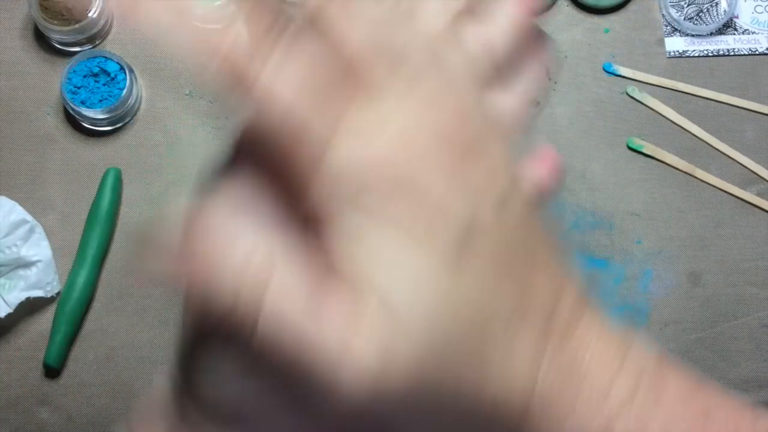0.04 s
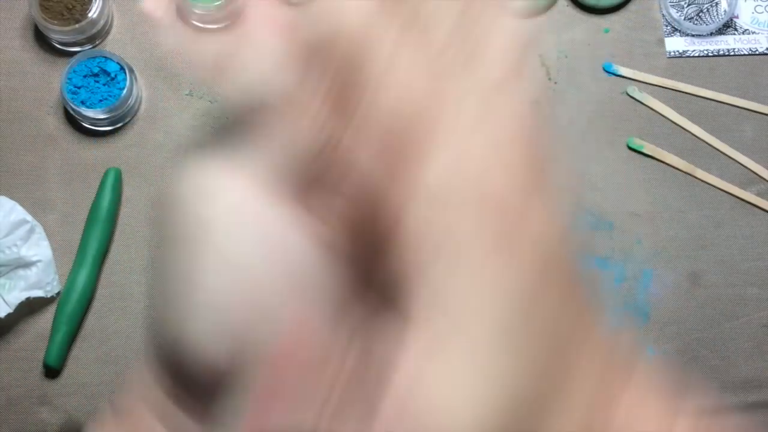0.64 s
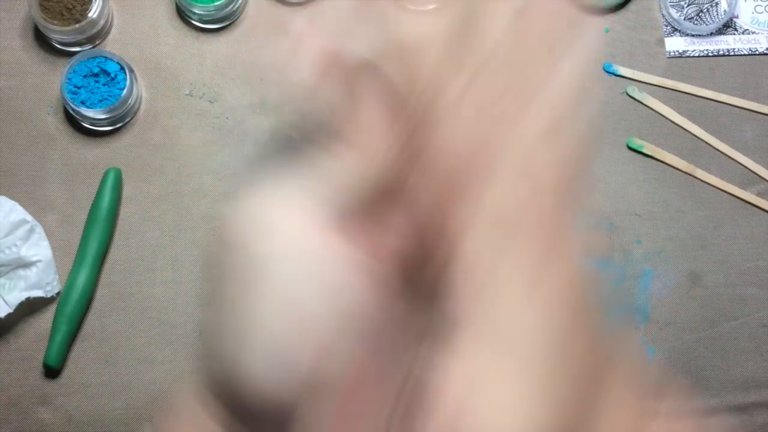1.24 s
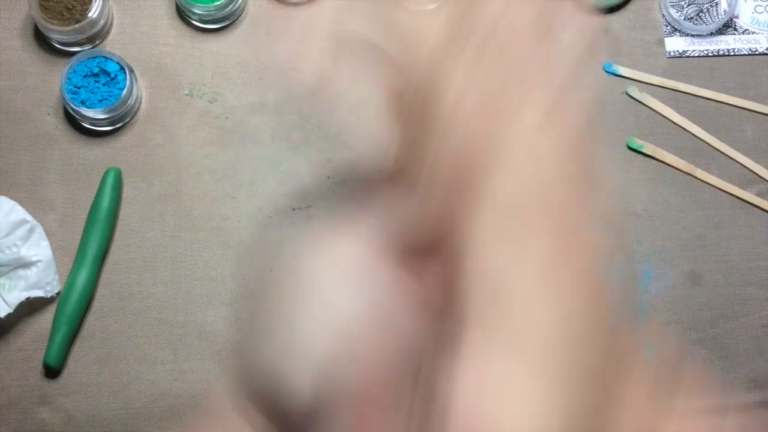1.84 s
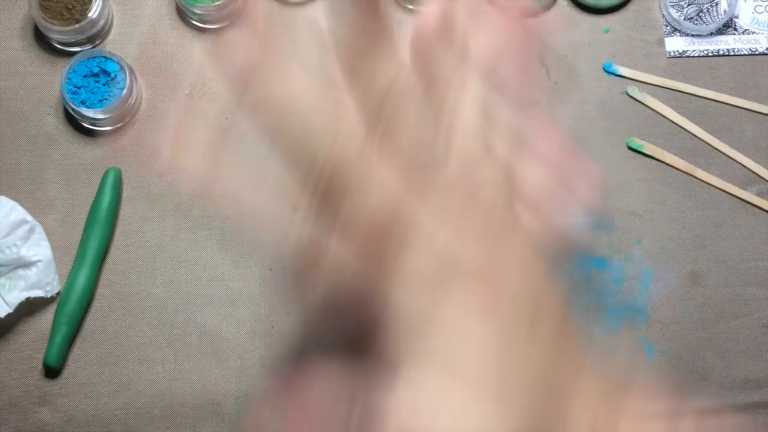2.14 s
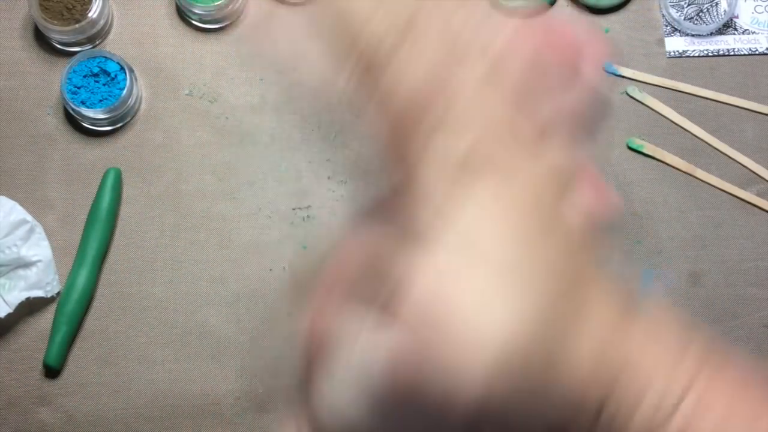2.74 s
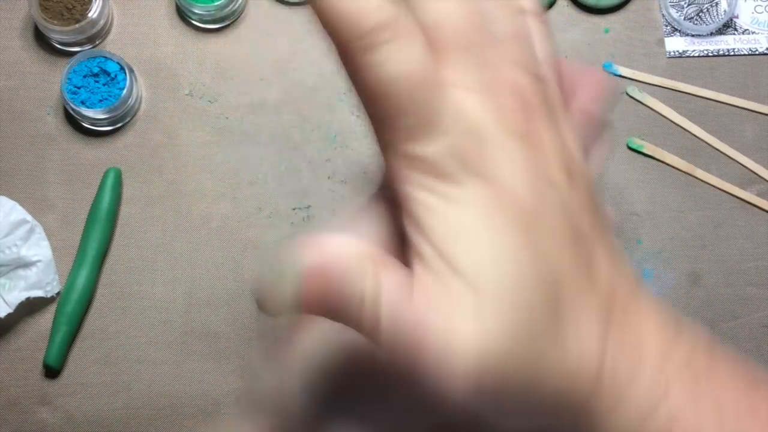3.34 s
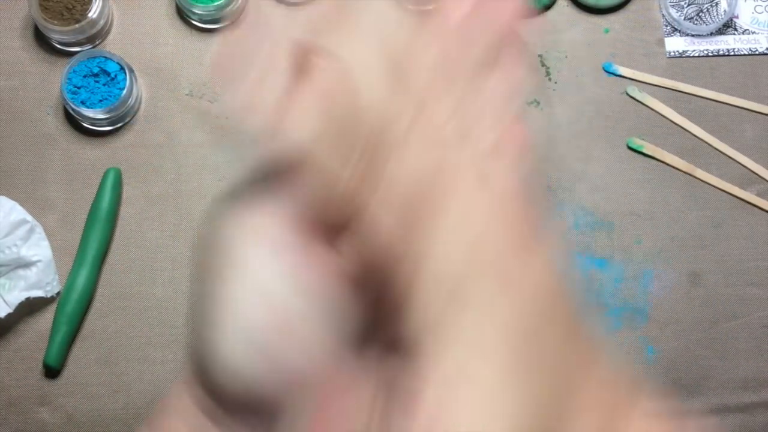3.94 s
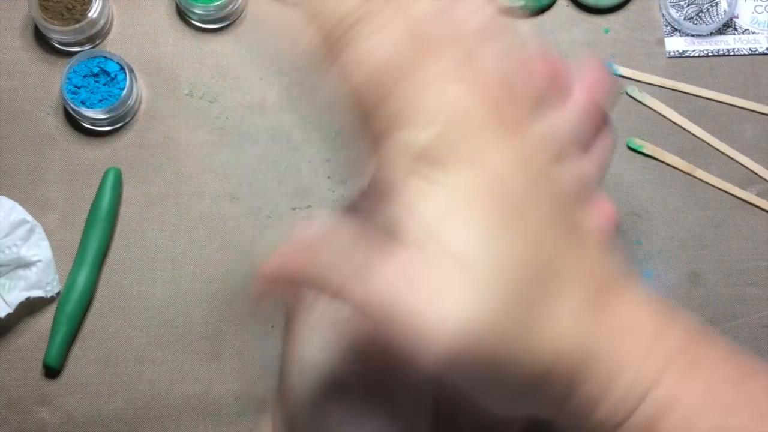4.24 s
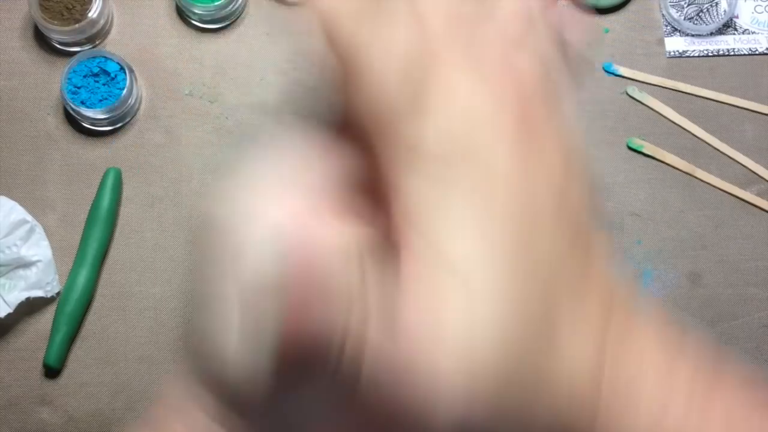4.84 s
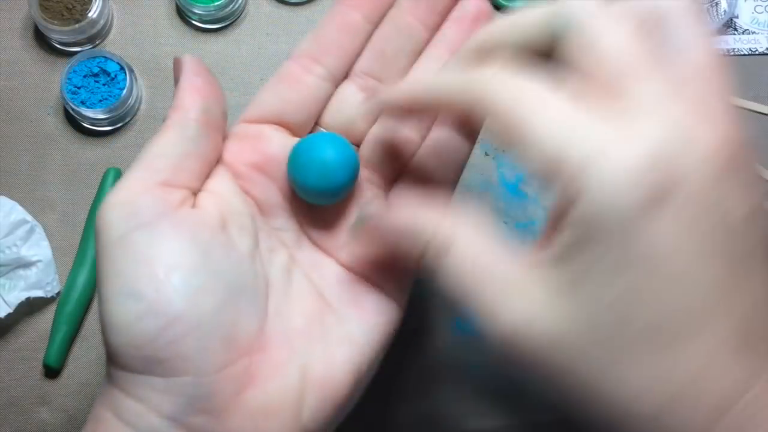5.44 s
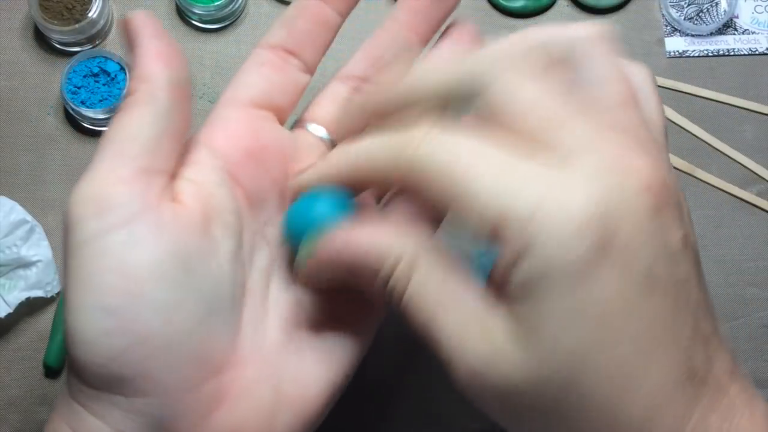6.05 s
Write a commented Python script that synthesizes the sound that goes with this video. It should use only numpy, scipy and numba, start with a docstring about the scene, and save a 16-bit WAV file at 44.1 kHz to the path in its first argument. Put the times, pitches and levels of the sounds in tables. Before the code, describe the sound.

Dry palms rub against each other, rolling a ball of soft clay, heard close above a table in a quiet room. The swishing starts lightly and is at full strength from about 0.5 seconds, running at roughly ten strokes a second. Bright, hissy pushes alternate with softer returns, and the hollow between the cupped hands adds a slight airy ring that shifts in pitch with each stroke. Underneath, the clay gives a faint dull rub and occasional soft, low bumps against the flesh. The rubbing is strongest around 1 second and becomes a little softer and looser from 3 seconds. Just after 5 seconds the hands slide apart with a last light swish. At about 5.6 and 5.9 seconds a fingertip very faintly brushes the palm to pick up the ball, over a low, steady room rumble and hiss.

```python
"""Rolling a clay ball between the palms.

Dry skin swishes over skin about ten times a second, close above a table in a quiet room.
The hollow between the cupped hands rings with the friction and dips in pitch as it opens.
The soft clay adds a dull rub and bumps against the flesh. After five seconds the hands part
and a fingertip brushes the palm to pick up the ball."""
import sys
import numpy as np
from scipy import signal
from scipy.fft import rfft, irfft, next_fast_len
from scipy.io import wavfile
from numba import njit

SR = 44100
rng = np.random.default_rng(int(sys.argv[2]) if len(sys.argv) > 2 else 0)


def int16_out(signal):
    """Quantize to a 16-bit WAV file."""
    q = np.round(np.clip(np.atleast_2d(signal).T, -1, 1) * 32767)
    wavfile.write(sys.argv[1], SR, q.astype(np.int16))


N = 269350
TIME = np.arange(N) / SR

# Noise spectra: freq_hz, relative_db
ROOM_SPECTRUM = [(25, -27), (40, -15), (54, 2.5), (90, -3.5), (160, -1.5), (240, -9.5), (320, -9),
                 (700, -13.5), (2800, -17), (8000, -18), (11000, -25), (14000, -35), (15500, -74)]
FLESH_SPECTRUM = [(25, -12), (45, -8.5), (65, 0), (110, -3), (200, -10.5), (400, -32.5)]
CLAY_SPECTRUM = [(120, -11), (220, 1), (330, 4.5), (550, -1), (800, -13), (1500, -24.5)]
SKIN_SPECTRUM = [(700, -28), (1300, -19), (2000, -6.5), (3200, -7.5), (4100, -7.5), (5200, -3.5),
                 (6300, -1), (7700, -0.5), (9000, -3), (11000, -6.5), (13000, -9), (15500, -11.5)]
# Ball bumping the flesh: peak_s, level_db
BALL_BUMPS = [(.04, -68), (.52, -69), (.645, -58.5), (.76, -65), (1.0, -66), (1.33, -63.5), (1.78, -69),
              (2.47, -66), (3.66, -69.5), (5.56, -67)]
# Clay rubbing the palms: time_s, level_db
CLAY_LEVEL = [(0, -77), (.6, -74.5), (1.12, -70), (1.35, -79.5), (1.8, -76.5), (2.05, -71), (2.4, -78),
              (3.25, -68), (3.7, -80.5), (4.55, -69.5), (5.3, -82.5), (5.75, -74), (6.11, -83)]
# Light sliding contact between strokes: time_s, drive_db
LIGHT_CONTACT = [(0.0, -81), (0.25, -65), (.6, -59.5), (0.9, -49.5), (1.2, -53), (1.31, -68.5), (1.4, -62),
                 (2.0, -55.5), (2.5, -58.5), (3.0, -57), (4.0, -56), (5.0, -57), (5.25, -84), (5.3, -94)]
# Finger spread, as the share of ring power in the finger gap: time_s, share
FINGER_SPREAD = [(0, 0.06), (.6, 0.3), (1.1, 0.38), (1.8, 0.33), (2.7, 0.14), (3.2, 0.56), (4.0, 0.56),
                 (4.9, 0.5), (5.05, 0.03)]
# Bright push of each circle: peak_s, drive_db, length_s, pitch_hz, ring_offset_db, overtone_offset_db
PUSH_STROKES = [(0.536, -42.5, 0.025, 2400, 3, 8), (0.782, -43, 0.039, 2210, 0.5, 5.5),
                (0.956, -40.5, 0.056, 2330, -1, 4), (1.16, -41.5, 0.038, 2430, -2, 6.5),
                (1.367, -48, 0.056, 2410, -2.5, 0), (1.571, -49, 0.046, 2550, -6, 0),
                (1.773, -44.5, 0.035, 2500, -3, 4.5), (1.964, -42.5, 0.038, 2360, -1, 1),
                (2.154, -41, 0.034, 2610, -2.5, 1.5), (2.371, -51.5, 0.046, 2490, -5, 3),
                (2.576, -44.5, 0.028, 2600, -1.5, 0), (2.788, -43.5, 0.039, 2580, -1.5, 2),
                (2.991, -45, .036, 2980, -4.5, 4.5), (3.227, -48, .052, 1960, -1, 6),
                (3.435, -44, 0.031, 1960, -2.5, 4.5), (3.641, -45.5, 0.045, 2960, -2, 2.5),
                (3.879, -46, 0.052, 1900, -2.5, 5.5), (4.092, -45.5, 0.035, 2090, -2, 8.5),
                (4.308, -48.5, 0.051, 1890, -1.5, 3.5), (4.525, -45, 0.051, 1990, -3.5, 1.5),
                (4.745, -47, 0.052, 1840, -2, 4.5), (4.965, -45.5, 0.04, 2500, -4, 6)]
# Softer return: peak_s, drive_db, length_s, pitch_hz, ring_offset_db, slide_oct_per_length
RETURN_STROKES = [(0.168, -51.5, 0.077, 1660, -1, -0.051), (0.336, -48.5, 0.044, 2360, .5, -0.16),
                  (0.417, -42.5, 0.052, 1780, -0.5, -0.071), (0.677, -53.5, 0.033, 3120, 8.5, -0.21),
                  (0.858, -40, 0.048, 2100, -2.5, -0.11), (1.053, -43.5, 0.052, 1880, 5, -0.016),
                  (1.256, -49, 0.048, 2750, 1, -0.031), (1.47, -51, 0.021, 2530, 3, 0.12),
                  (1.666, -47.5, .028, 2410, 2.5, -0.12), (1.85, -46, 0.031, 2390, .5, -0.02),
                  (2.044, -46, 0.037, 2430, 1.5, -0.1), (2.237, -54, 0.1, 2580, 0.5, 0.016),
                  (2.478, -52, .027, 2650, 1, 0.047), (2.672, -47.5, .033, 2500, 5, 0.079),
                  (2.877, -47.5, 0.056, 2690, 0, 0.047), (3.096, -56, 0.041, 2950, 1.5, 0.02),
                  (3.319, -51.5, 0.051, 2600, 1, 0.071), (3.541, -51, .072, 2690, -0.5, 0.25),
                  (3.752, -51.5, 0.07, 2400, -0.5, 0), (3.966, -51.5, 0.062, 2030, 2, .35),
                  (4.194, -51, 0.051, 1900, 1, .35), (4.415, -51, 0.069, 2010, -1, 0.38),
                  (4.645, -50, 0.088, 2280, -4.5, 0.26), (4.856, -50, 0.036, 2880, 1, 0.025),
                  (5.075, -51, 0.074, 1845, 2.5, 0.18)]
# Fingers brushing skin, mostly plain hiss: peak_s, drive_db, length_s
FINGER_BRUSHES = [(0.118, -55, 0.073), (0.307, -50, 0.08), (0.5, -46.5, 0.056), (0.71, -41, 0.054),
                  (1.129, -43, 0.043), (1.507, -55, .048), (1.715, -54, 0.064), (1.924, -48.5, 0.014),
                  (2.116, -47.5, 0.03), (2.308, -48.5, .034), (2.733, -53.5, 0.043), (2.96, -47.5, 0.053),
                  (3.36, -52, 0.051), (5.132, -58.5, 0.15), (5.63, -71, .06), (5.87, -79, 0.053)]

PUSH_RISE, RETURN_RISE, BRUSH_RISE = 0.39, 0.51, 0.47  # share of length spent speeding up


def from_db(db):
    """Decibels to gain."""
    return 10 ** (np.asarray(db) / 20)


def unit_rms(x):
    """Scale to rms 1."""
    return x / np.sqrt(np.mean(x ** 2) + 1e-20)


def curve(rows):
    """Interpolate (time_s, value) rows at every sample."""
    return np.interp(TIME, *np.transpose(rows))


def drift(rate_hz):
    """Slow random wander, rms about 1."""
    hop, warmup = 40, 2000
    pole = np.exp(-2 * np.pi * hop * rate_hz / SR)
    noise = rng.standard_normal(N // hop + warmup + 2)
    slow = signal.lfilter([1], [1, -2 * pole, pole * pole], noise)[warmup:]
    return np.interp(np.arange(N) / hop, np.arange(len(slow)), unit_rms(slow))


def swell(peak_s, length_s, rise, shape):
    """Envelope peaking at 1; shape 1 is pointed, 2 a bell, higher a flat top."""
    out = np.zeros(N)
    near = slice(max(int((peak_s - .25) * SR), 0), int((peak_s + .25) * SR))
    since_s = TIME[near] - peak_s
    side_s = length_s * np.where(since_s < 0, rise, 1 - rise)
    out[near] = np.exp(-np.abs(since_s / side_s) ** shape)
    return out


def coloured(x, spectrum):
    """Apply a smooth spectrum; rms 1."""
    size = next_fast_len(N)
    freq_hz, level_db = np.transpose(spectrum)
    bins_hz = np.maximum(np.arange(size // 2 + 1) * SR / size, 1)
    gain = from_db(np.interp(np.log(bins_hz), np.log(freq_hz), level_db))
    return unit_rms(irfft(rfft(x, size) * gain, size)[:N])


@njit
def moving_bandpass(x, angle_rad, radius):
    """Two-pole band-pass with a per-sample centre."""
    y = np.zeros(len(x))
    for i in range(2, len(x)):
        y[i] = x[i] - x[i - 2] + 2 * radius * np.cos(angle_rad[i]) * y[i - 1] - radius ** 2 * y[i - 2]
    return y


def air_resonance(x, centre_hz, width_hz, band_hz):
    """Air pocket with moving pitch, skirts cut outside band_hz; rms 1."""
    rung = moving_bandpass(x, 2 * np.pi * centre_hz / SR, np.exp(-np.pi * width_hz / SR))
    skirts = signal.butter(2, band_hz, "band", fs=SR, output="sos")
    return unit_rms(signal.sosfilt(skirts, rung))


def room_tone(level_db=-69):
    """Steady rumble and hiss of the room."""
    return from_db(level_db) * coloured(rng.standard_normal(N), ROOM_SPECTRUM)


def reflections(x, relative_db=-15, t60_s=0.23, count=40):
    """Table and walls return a short scatter of echoes."""
    echoes = np.zeros(N)
    for delay_s in rng.uniform(.003, .15, count):
        lag = int(delay_s * SR)
        echoes[lag:] += rng.choice([-1, 1]) * from_db(-60 * delay_s / t60_s) * x[:N - lag]
    return from_db(relative_db) * np.std(x) * unit_rms(echoes)


def flesh_rumble(rolling_db=-72, follow=0.12):
    """Flesh rumbles with the contact and swells at each bump of the ball."""
    contact_db = curve(LIGHT_CONTACT)
    power = from_db(rolling_db + follow * (contact_db - np.median(contact_db))) ** 2
    for peak_s, level_db in BALL_BUMPS:
        power += (from_db(level_db) * swell(peak_s, length_s=0.094, rise=0.34, shape=0.87)) ** 2
    return np.sqrt(power) * coloured(rng.standard_normal(N), FLESH_SPECTRUM)


def clay_rub():
    """Soft clay rubs dully on the palms."""
    return from_db(curve(CLAY_LEVEL)) * coloured(rng.standard_normal(N), CLAY_SPECTRUM)


def friction(slips_per_s, spread_db, smooth_db):
    """Skin ridges catch and let go: dense uneven slips in a smooth hiss; rms 1."""
    sizes = from_db(spread_db * np.minimum(rng.exponential(1, N), 6)) * rng.choice([-1, 1], N)
    slips = sizes * (rng.random(N) < slips_per_s / SR)
    return unit_rms(unit_rms(slips) + from_db(smooth_db) * rng.standard_normal(N))


def stroke_envelopes():
    """Sliding drives hiss, ring and overtone; strokes add in power to the light contact."""
    # peak_s, drive_db, length_s, rise, ring_offset_db, overtone_offset_db
    strokes = [(s, db, length_s, PUSH_RISE, ring_db, overtone_db)
               for s, db, length_s, _, ring_db, overtone_db in PUSH_STROKES]
    strokes += [(s, db, length_s, RETURN_RISE, ring_db, -18)
                for s, db, length_s, _, ring_db, _ in RETURN_STROKES]
    strokes += [(s, db, length_s, BRUSH_RISE, -13, -7) for s, db, length_s in FINGER_BRUSHES]
    contact_db = curve(LIGHT_CONTACT)
    hiss, ring, overtone = (from_db(contact_db + offset_db) ** 2 for offset_db in (0, -7.5, -8))
    for peak_s, db, length_s, rise, ring_db, overtone_db in strokes:
        hiss += (from_db(db) * swell(peak_s, length_s, rise, shape=1.94)) ** 2
        ring += (from_db(db + ring_db) * swell(peak_s, 1.21 * length_s, rise, shape=2.67)) ** 2
        late_s = peak_s + 0.041 * length_s
        overtone += (from_db(db + overtone_db) * swell(late_s, 0.93 * length_s, rise, shape=1.94)) ** 2
    return np.sqrt([hiss, ring, overtone])


def pressure(dip_db=-4, ease_s=0.0064, landing_s=0.00086):
    """Friction fades as pressure eases before each push and returns as the skin lands."""
    level_db = np.zeros(N)
    dip_s = ease_s + landing_s
    for peak_s, _, length_s, *_ in PUSH_STROKES:
        touch_s = peak_s - 1.7 * PUSH_RISE * length_s
        level_db += dip_db * swell(touch_s, dip_s, rise=ease_s / dip_s, shape=1)
    return from_db(level_db)


def hollow_pitch_hz(closed_hz=2840, closing_share=0.61, push_slide_oct=-0.22):
    """The hollow opens and dips in each stroke, slides with the palms, then partly closes."""
    strokes = [(s, length_s, hz, push_slide_oct) for s, _, length_s, hz, _, _ in PUSH_STROKES]
    strokes += [(s, length_s, hz, slide_oct) for s, _, length_s, hz, _, slide_oct in RETURN_STROKES]
    open_hz = curve([(s, hz) for s, _, hz, _ in sorted(strokes)])
    opening, bend_oct = np.zeros(N), np.zeros(N)
    for peak_s, length_s, _, slide_oct in strokes:
        opening += swell(peak_s, 0.71 * length_s, rise=0.51, shape=3.95)
        progress = (TIME - peak_s) / length_s
        bend_oct += slide_oct * progress * swell(peak_s, 2 * length_s, rise=.5, shape=2)
    closure = closing_share * (1 - np.minimum(opening, 1))
    return (open_hz + closure * (closed_hz - open_hz)) * 2 ** bend_oct


def palms(hiss_trim_db=-2, ring_trim_db=-4.5, overtone_trim_db=-5.5):
    """Skin friction, heard directly and through the air pockets between the hands."""
    hiss, ring, overtone = stroke_envelopes()
    spread = curve(FINGER_SPREAD)
    reshaping = drift(rate_hz=32)  # the rolling ball deforms the hollow, more so in loose hands
    hollow_hz = hollow_pitch_hz() * (1 + (.02 + .09 * spread) * reshaping)
    overtone_hz = (4740 + 600 * spread) * (1 + .04 * reshaping)
    ring *= from_db(2 * np.log2(hollow_hz / 2380))  # an open, low hollow leaks and rings less
    skin = coloured(friction(slips_per_s=4500, spread_db=-0.5, smooth_db=3.5), SKIN_SPECTRUM)
    palm_slips = friction(slips_per_s=4400, spread_db=1.5, smooth_db=3.5)
    hollow = air_resonance(palm_slips, hollow_hz, width_hz=115, band_hz=(1300, 3950))
    upper_mode = air_resonance(palm_slips, overtone_hz, width_hz=1000, band_hz=(3900, 7400))
    finger_slips = friction(slips_per_s=3200, spread_db=3, smooth_db=-6.5)
    gap_hz = 2300 + .24 * hollow_hz + 240 * drift(rate_hz=28)  # the narrower finger gap rings higher
    finger_gap = air_resonance(finger_slips, gap_hz, width_hz=620, band_hz=(2200, 3600))
    pockets = np.sqrt(1 - spread) * hollow + np.sqrt(spread) * finger_gap
    grip = pressure() * from_db(1.54 * drift(rate_hz=53))  # tacky skin grips unevenly
    return grip * (from_db(hiss_trim_db) * hiss * skin
                   + from_db(ring_trim_db) * ring * pockets
                   + from_db(overtone_trim_db) * overtone * upper_mode)


def scene():
    """Close hands and clay over room tone; mono."""
    swishes = palms()
    return (room_tone() + reflections(swishes) + flesh_rumble() + clay_rub() + swishes)[None]


def record(dry):
    """Steep low-pass."""
    cutoff_hz = 15450
    return signal.sosfilt(signal.ellip(12, .1, 70, cutoff_hz, fs=SR, output="sos"), dry)


dry = scene()
out = record(dry)
int16_out(out)
```